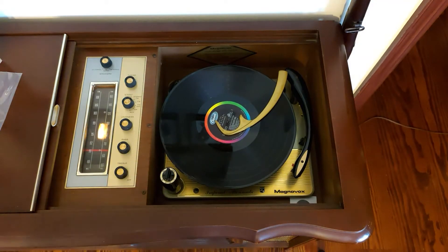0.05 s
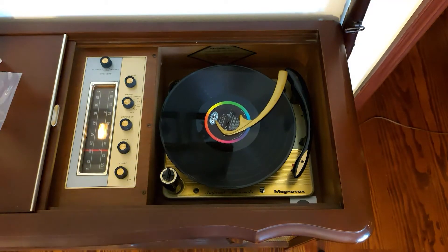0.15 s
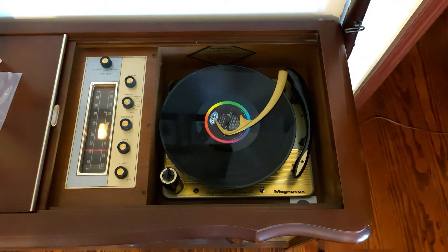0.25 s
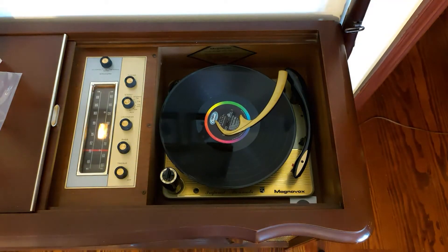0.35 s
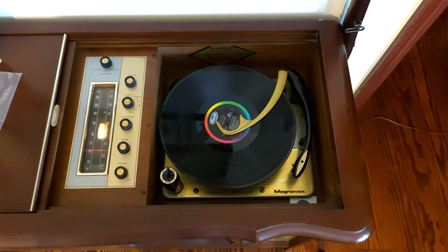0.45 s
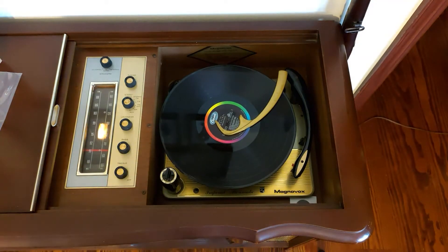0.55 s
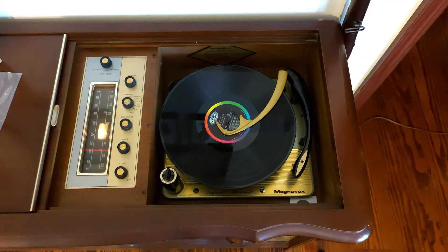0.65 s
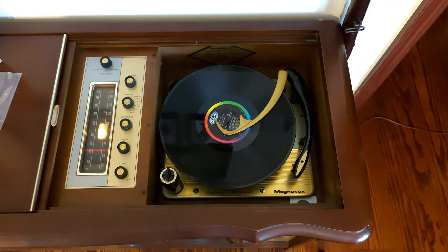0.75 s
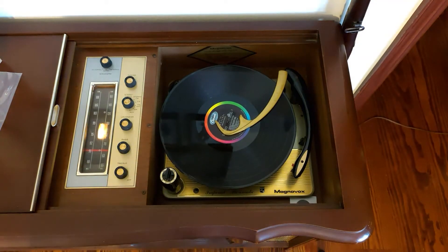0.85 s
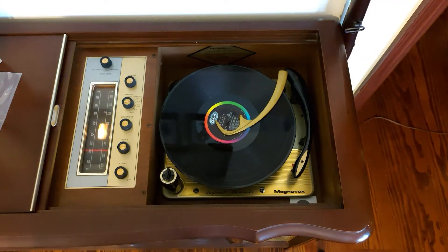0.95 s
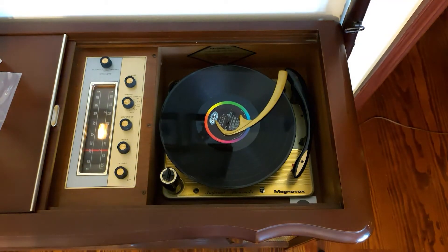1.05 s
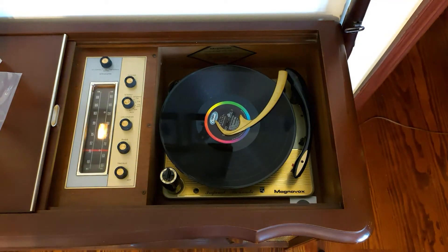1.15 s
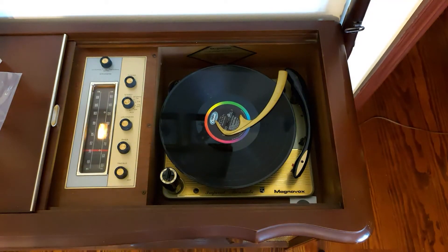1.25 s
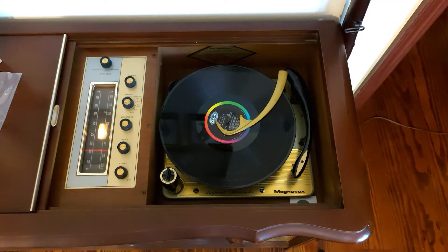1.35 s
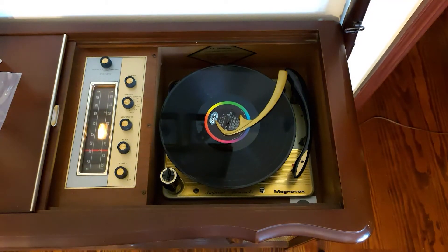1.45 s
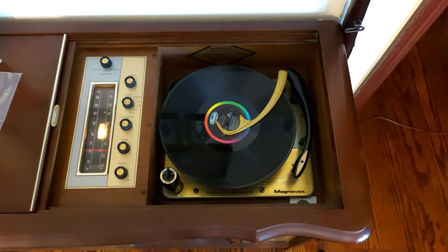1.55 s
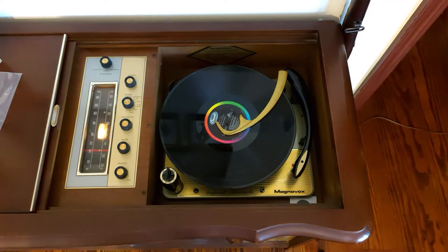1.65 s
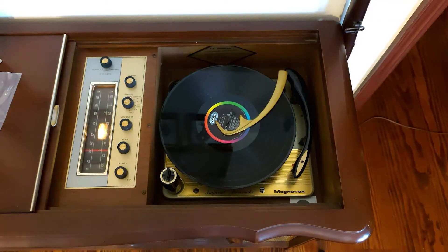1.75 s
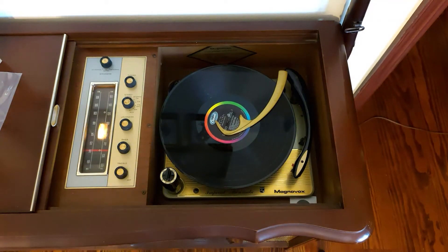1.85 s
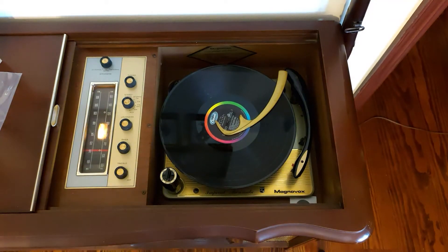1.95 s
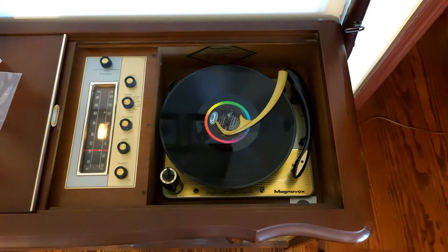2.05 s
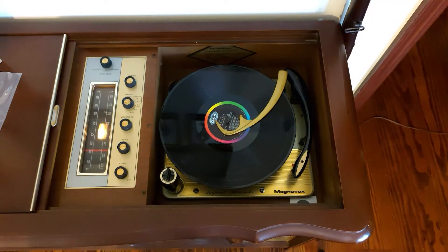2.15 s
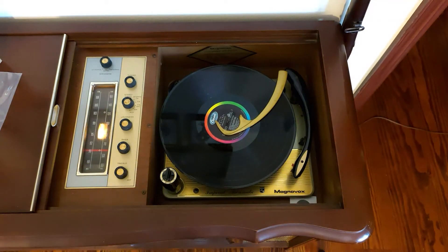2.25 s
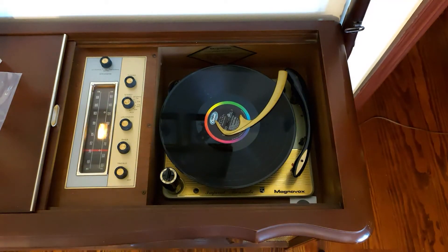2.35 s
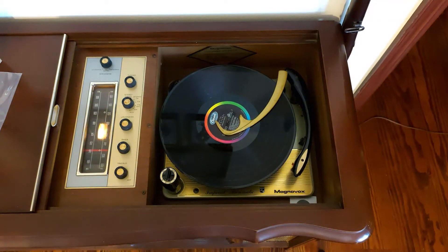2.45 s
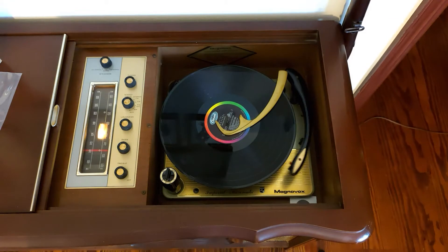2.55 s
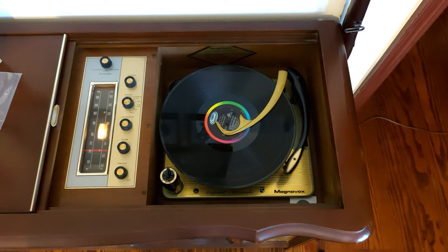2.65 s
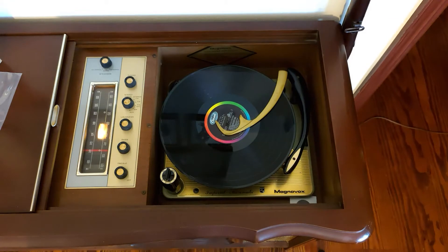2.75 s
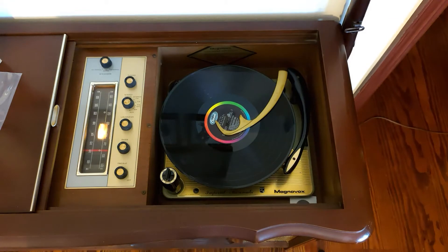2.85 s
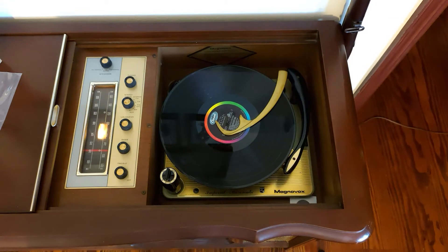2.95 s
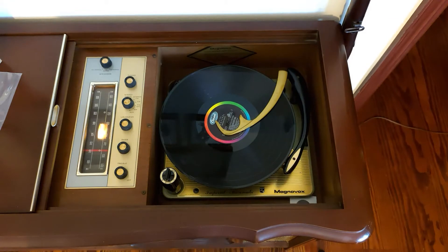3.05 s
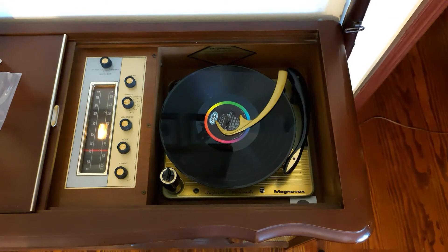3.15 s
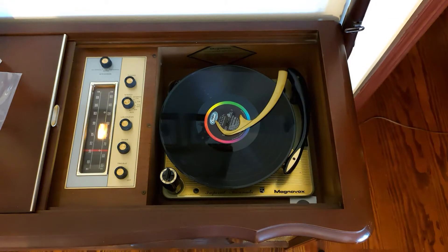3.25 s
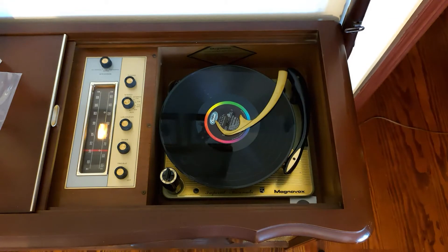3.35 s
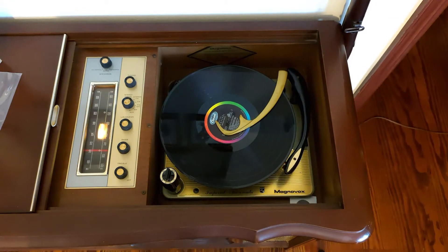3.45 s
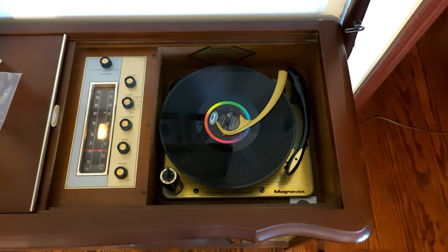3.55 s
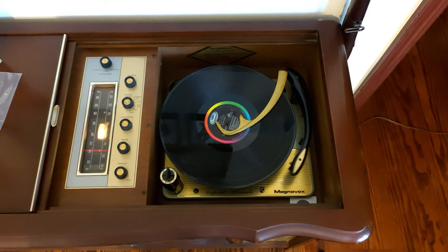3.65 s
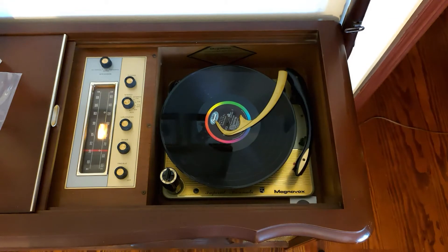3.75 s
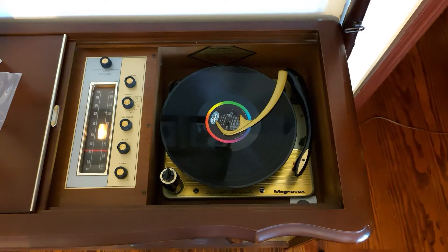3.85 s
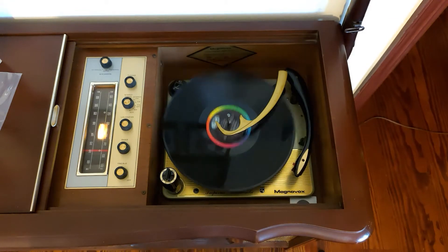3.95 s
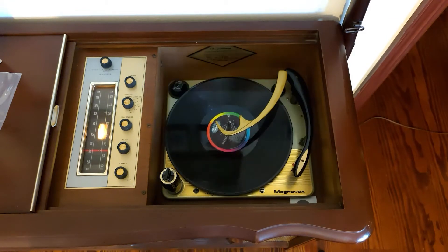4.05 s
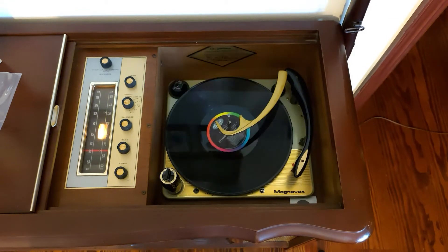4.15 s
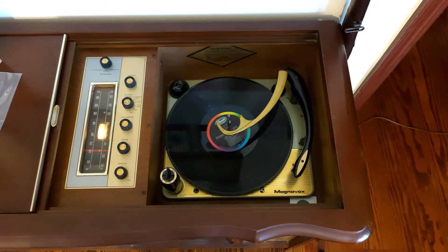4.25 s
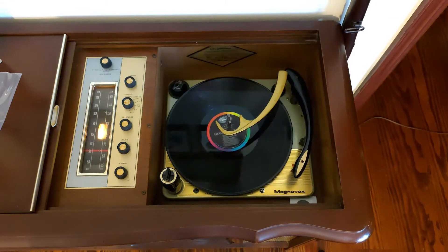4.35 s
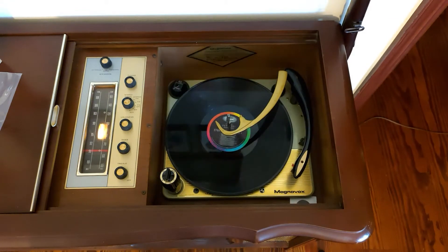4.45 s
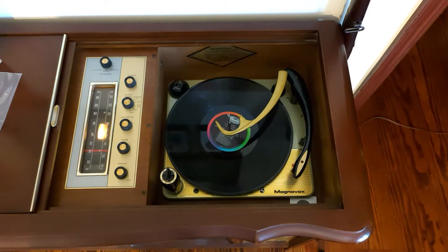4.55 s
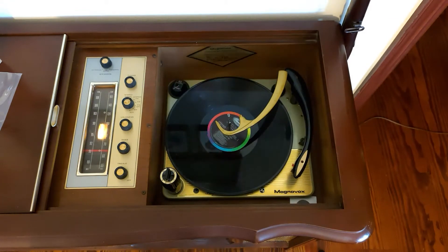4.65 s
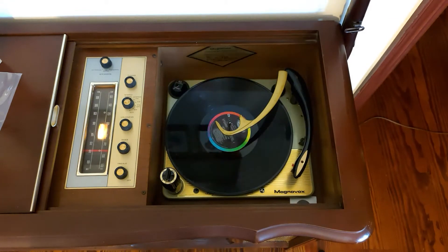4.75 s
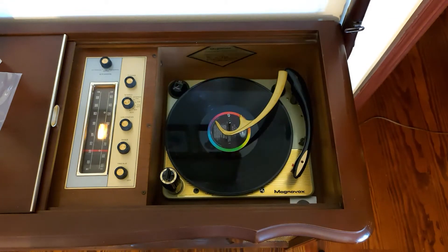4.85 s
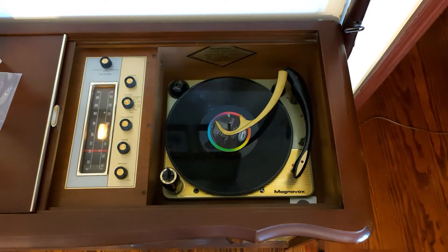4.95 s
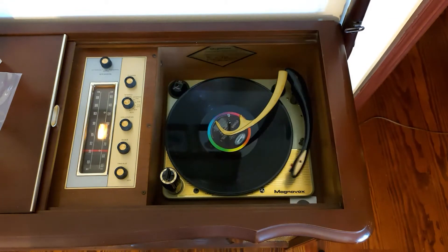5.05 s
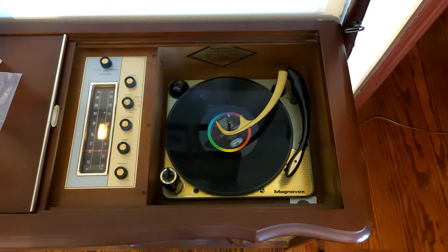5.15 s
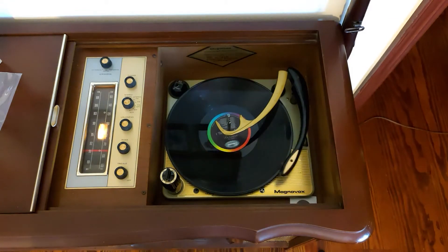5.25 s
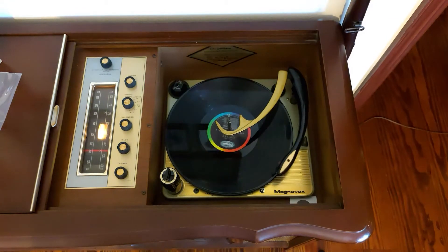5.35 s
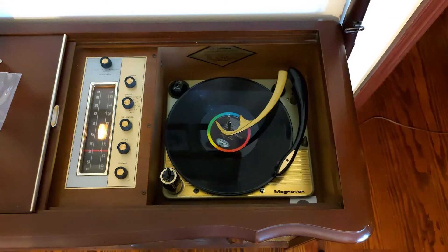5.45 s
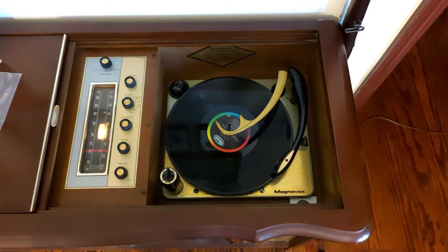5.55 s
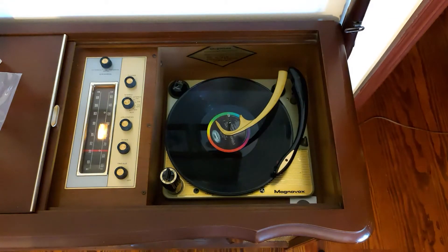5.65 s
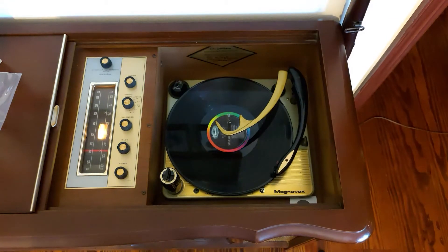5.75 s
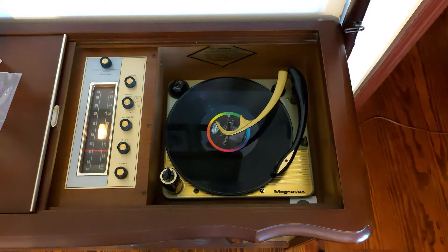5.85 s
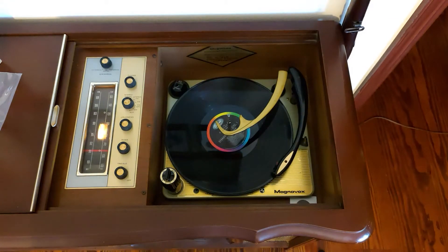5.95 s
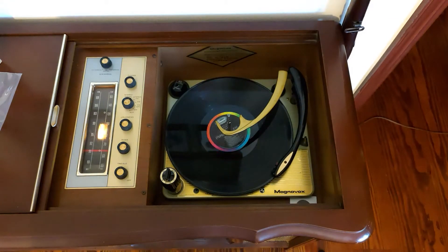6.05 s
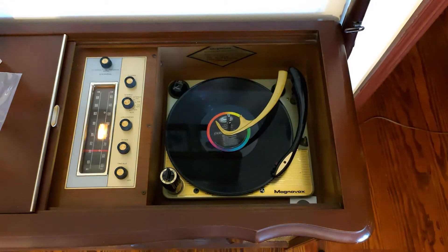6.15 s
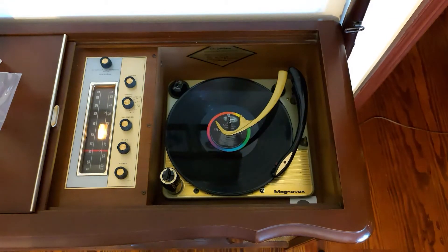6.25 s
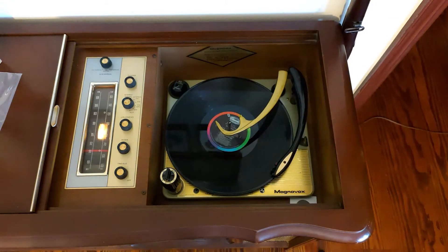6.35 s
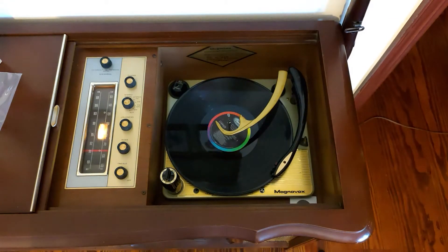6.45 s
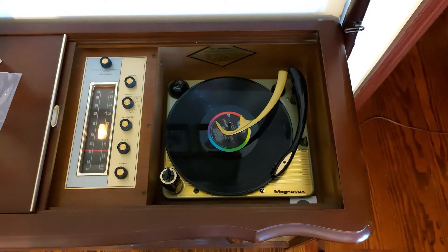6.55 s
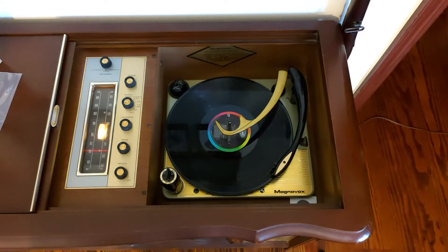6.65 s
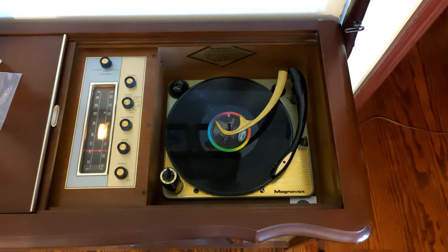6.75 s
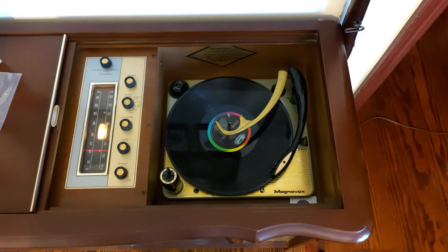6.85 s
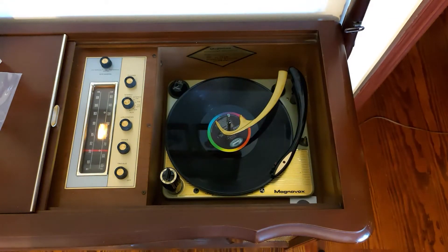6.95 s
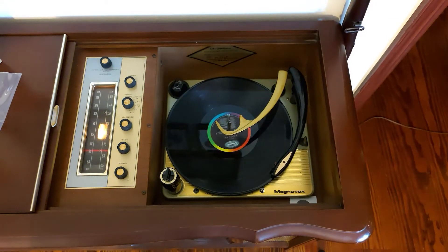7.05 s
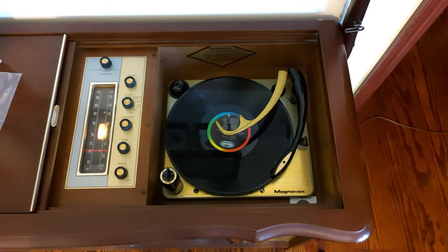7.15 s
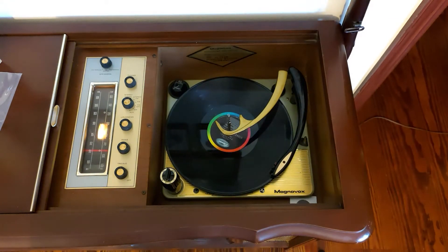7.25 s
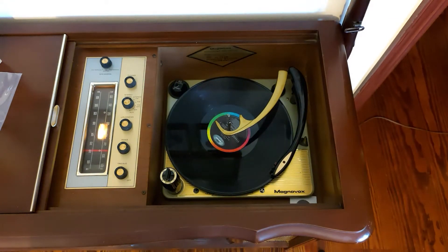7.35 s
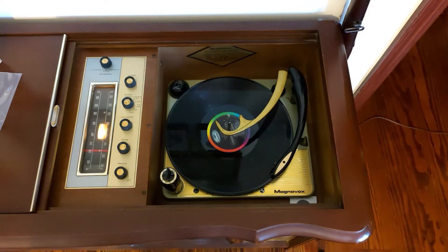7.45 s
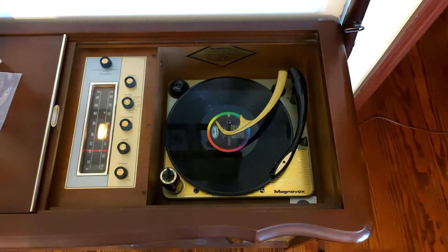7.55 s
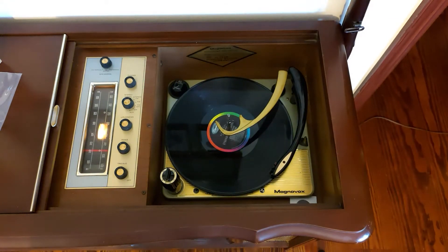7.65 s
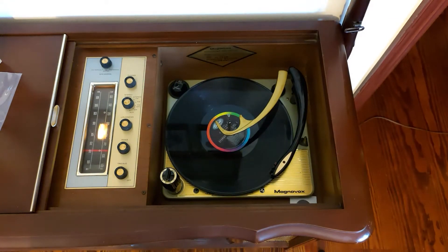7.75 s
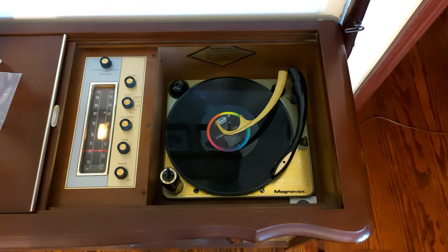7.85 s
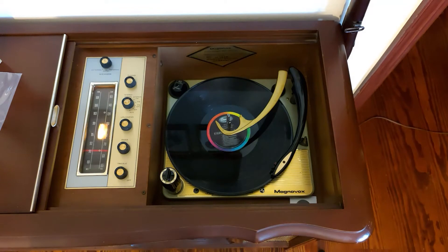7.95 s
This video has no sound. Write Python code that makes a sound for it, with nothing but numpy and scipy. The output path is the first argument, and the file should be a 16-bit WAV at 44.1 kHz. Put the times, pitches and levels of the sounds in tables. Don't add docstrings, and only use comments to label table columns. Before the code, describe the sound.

In a small quiet room, a faint motor hum comes first, with one small knock. Levers tap and clunk and a cam rubs in short catches. A very loud steel latch crack rings briefly, then more clunks, a heavy soft double thump as the disc drops, sharp clicks, and the needle landing with bassy speaker rumble. Close microphone, slight room echo.

```python
import sys
import numpy as np
from scipy import signal
from scipy.fft import rfft, irfft
from scipy.io import wavfile
from scipy.ndimage import uniform_filter1d

SR = 44100
rng = np.random.default_rng(int(sys.argv[2]) if len(sys.argv) > 2 else 0)


def inscribe(sig):
    pcm = np.round(np.clip(np.atleast_2d(sig).T, -1, 1) * 32767)
    wavfile.write(sys.argv[1], SR, pcm.astype(np.int16))


def boost_factor(decibels):
    exponent = np.asarray(decibels, float) / 20
    return 10 ** exponent


N = 352359
BLOW_T = np.arange(int(0.6 * SR)) / SR

# [f/Hz, level/dB per Hz]
AIR = [(20, -23), (53, -13), (85, -17.5), (115, -2), (150, -8.5), (250, 0), (330, -9), (480, -7),
       (700, -11), (1750, -16.5), (5000, -23.5), (9000, -28.5), (15300, -21.5), (16500, -34.5)]
AIR_DB = -68
# [f/Hz, level/dB]
HUM_LINES = [(118.4, -81), (177.6, -82), (242.2, -87.5), (479.1, -89)]
# [f/Hz, level/dB]
MOTOR_LINES = [(59.2, -83.5), (177.6, -74.5), (301.5, -81)]
# [t/s, level/dB]
MOTOR_LOAD = [
    (0, -67),
    (2.6, -3),
    (2.9, -6.5),
    (4.6, 0.5),
    (6, -0.5),
    (8, 0.5),
]
# [f/Hz, t60/s, echo level/dB]
ROOM = [(59.65, .45, -6), (301, 0.42, -5), (1498, 0.36, -3.5), (5000, 0.455, -8), (13960, 0.21, -3.5)]
ROOM_RISE_S = 0.0015

# [f/Hz, width/Hz, level/dB]
PIVOT = [(1300, 200, -12), (2008, 240, -3), (2630, 265, 4), (3030, 500, -4)]
# [t/s, level/dB]
SWINGS = [
    (6.59, -59.5),
    (6.664, -74),
    (6.928, -71),
]
SWING_RISE_S, SWING_FADE_DB_S = 0.026, 94

# [f/Hz, width/Hz, level/dB]
DECK = [(260, 150, -1.5), (637, 63, -0.5), (1124, 47, -1.5), (1650, 53, -7), (2700, 530, -11),
        (4370, 1500, -14.5)]
# [t/s, level/dB]
CATCHES = [
    (2.775, -51.5),
    (2.945, -67),
    (3.001, -63.5),
    (3.419, -78),
    (5.14, -66),
    (5.182, -55),
    (5.22, -60),
    (5.324, -55),
]
CATCH_RISE_S, CATCH_FADE_DB_S = 0.01, 255
TOOTH_FIRST_S, TOOTH_GAP_S, TOOTH_DB, TOOTH_GROWS_DB = 3.125, 0.0672, -65, 1.6

# [f/Hz, level/dB, t60/s]
CABINET = [(92, -6.5, 0.097), (167, -2.5, 0.41), (276, -20, 1)]
# [t/s, level/dB, plate note f/Hz, contact/ms]
TAPS = [(2.252, -51, 1040, 12), (2.366, -51.5, 650, 18), (2.769, -30.5, 515, 12), (3.737, -52, 480.8, 5.5),
        (3.759, -48.5, 500, 13), (3.898, -50.5, 624, 4.2), (3.938, -55, 689.5, 6), (4.543, -49, 590, 9.2),
        (5.092, -54.5, 940, 6), (5.589, -51.5, 523, 9.5), (6.56, -41.5, 1300, 8.6), (7.231, -45, 777, 5),
        (2.779, -40, 1080, 6.9)]
# [t/s, level/dB, plate note f/Hz, contact/ms]
TWANGS = [
    (0.288, -55.5, 540, 14),
    (3.574, -56, 810, 26),
    (3.977, -35, 767, 31),
    (4.011, -39, 786, 16),
    (7.772, -46.5, 480, 12),
]
# [t/s, level/dB, plate note f/Hz, contact/ms]
THUMPS = [(2.775, -37.5, 474, 4.9), (3.819, -53.5, 474, 12), (3.971, -50.5, 829, 5.7),
          (5.134, -54, 600, 6.6), (5.173, -44, 1080, 4.7), (5.204, -44.5, 1170, 3.6), (5.211, -35, 179, 6),
          (5.313, -46, 1150, 6.9), (5.331, -42, 505, 6.6), (7.329, -36.5, 474, 4.2), (7.548, -48, 505, 9.1)]
# [note share level/dB, cabinet beside plate level/dB]
TAP_MIX = (9.8, -26)
TWANG_MIX = (12, -15)
THUMP_MIX = (0.3, -0.5)

# [t/s, level/dB, ring f/Hz, contact/ms]
KNOB = [
    (2.252, -40, 2750, 8.4),
    (2.2882, -44.5, 1650, 8.2),
]
# [t/s, level/dB, ring f/Hz, contact/ms]
SNAPS = [
    (3.5594, -62.5, 1710, 7.4),
    (4.074, -52.5, 2317, 4),
    (5.3108, -46.5, 2700, 3.4),
    (7.2229, -45.5, 2545, 6.7),
    (7.3679, -40, 1880, 5),
    (7.4364, -43, 3560, 5.7),
]
# [t/s, level/dB, ring f/Hz, contact/ms]
TICKS = [(1.1894, -68, 1810, 4.6), (3.695, -64, 5600, 6), (3.7323, -53, 5730, 12), (4.049, -59, 6470, 5.8),
         (4.341, -57, 7000, 3.6), (5.1027, -52, 2390, 9), (6.5563, -32, 2200, 3.2), (7.231, -33, 2210, 5.2),
         (7.3073, -49, 3670, 9), (7.3267, -37, 2430, 20), (7.3426, -32.5, 2740, 15),
         (7.5554, -59, 1720, 6.5), (7.641, -54.5, 2190, 4.6)]
# [t/s, level/dB, ring f/Hz, contact/ms]
PINGS = [(3.0001, -45.5, 1860, 7.2), (3.4171, -55, 1510, 3.4), (3.7604, -49, 2880, 4.5),
         (5.2024, -61, 2760, 3.9), (5.315, -53, 2750, 9), (5.176, -64, 2700, 5.3), (5.5832, -52.5, 2100, 5),
         (5.5952, -53.5, 2440, 4.5), (7.0225, -58, 2560, 4), (7.0996, -49.5, 2770, 17),
         (7.7692, -53.5, 3380, 18.6), (7.8423, -56.5, 3330, 5)]
# [t/s, level/dB, ring f/Hz, contact/ms]
CLACKS = [(0.287, -52, 2600, 7.7), (2.7704, -61, 2160, 3.3), (2.7787, -47.5, 1580, 4.2),
          (2.9396, -54, 1650, 22), (3.8175, -55.5, 3170, 11), (3.9864, -54.5, 1606, 3.1),
          (5.0905, -51.5, 2520, 8.9), (5.1715, -44.5, 2700, 4.4), (6.544, -44, 2470, 10.2),
          (7.1383, -72, 2810, 6.6), (7.469, -44.5, 1390, 2.6)]
# [ring share level/dB, bright tick beside crack level/dB]
KNOB_MIX = (-1, 4.4)
SNAP_MIX = (-6.5, -4.5)
TICK_MIX = (-5.5, -5.5)
PING_MIX = (19, -17)
CLACK_MIX = (0.5, -19)

# [f/Hz, level/dB per Hz]
SCRAPE = [(700, -6), (1300, -6.5), (2200, -6), (3500, -6), (5500, -26), (10000, -17.5), (16000, -27.5)]
# [t/s, level/dB]
SKIDS = [
    (7.232, -47.5),
    (7.348, -42.5),
    (7.438, -52.5),
]
SKID_RISE_S, SKID_FADE_DB_S = 0.012, 1002.5
# [f/Hz, width/Hz, level/dB]
SPEAKER = [(100.2, 16.6, 1.5), (135.7, 36, 3), (176.6, 39, 2), (252.8, 59, -4.5), (365, 116, -19.5),
           (474, 49, -13.5), (607, 37, -16)]
# [t/s, rumble level/dB]
BUMPS = [
    (7.268, -36),
    (7.305, -39.5),
    (7.345, -30.5),
    (7.368, -31.5),
    (7.44, -36),
    (7.484, -38),
    (7.558, -45),
    (7.666, -40.5),
    (7.846, -52),
    (7.972, -56),
]
BUMP_RISE_S, BUMP_FADE_DB_S = 0.026, 236
LANDS_S, GROOVE_DB, DUST_DB, SETTLES_DB_S, DUST_CLEARS_DB_S = 7.268, -49, -61, 7.5, 13

# [t/s, level/dB, push/ms, shudder below it level/dB, chatter level/dB]
DROPS = [
    (6.154, -7, 2.27, -5.5, -27.5),
    (6.1585, -11.5, 5.7, -17, -35.5),
    (6.237, -11, 1.17, -4.5, -28),
    (6.244, -11, 6.3, -7, -29.5),
]
# [f/Hz, level/dB, t60/s]
PLATTER = [(479, 4, 0.2), (624, 2.5, 0.12), (670, -7, 0.353), (829, -22, 0.3), (950, -16, 0.18),
           (1046, -16, 0.245)]
# [f/Hz, level/dB per Hz]
DISC_TONE = [(40, -39), (95, 2.5), (165, -3), (220, -11.5), (280, -9), (360, -20.5), (480, -14),
             (1300, -26), (3500, -32), (6500, -54), (10000, -54.5), (16000, -77)]

# [t/s, level/dB, brightness/dB an octave, pin level/dB, contact/ms]
LATCH_BLOWS = [
    (4.086, -3.5, 1.8, -47.5, 3.5),
    (4.0988, -4.5, -0.6, -42.5, 4.6),
    (4.113, -17.5, 0.2, -32, 2.9),
    (4.121, -16.5, -3, -42.5, 2.3),
]
# [f/Hz, level/dB, t60/s]
LATCH_DECK = [(265, 0, 0.38), (554.5, -2.5, 0.19), (810, -6.5, 0.09), (824, -3, 0.23), (1031, 1, 0.17),
              (1077, -4, 0.22), (1300, 7.5, 0.15), (1420, -10, 0.05), (1691, -18, 1.0), (1810, -19, 0.15),
              (2070, -12.5, 0.32), (2120, -13, 0.28), (2390, -15, 0.22), (3000, -18.5, 0.72)]
# [f/Hz, level/dB, t60/s]
LATCH_PIN = [(10060, -4, .24), (10170, 0, .3), (10300, -5, .2)]
# [f/Hz, level/dB per Hz]
LATCH_TONE = [(60, -39), (120, -16.5), (200, -19), (270, -8.5), (560, -7.5), (1000, 2), (1500, -5.5),
              (2300, -7.5), (4000, -21), (6500, -31), (10000, -27.5), (15300, -43), (16400, -52)]


def level(x, db):
    return x * boost_factor(db) / np.sqrt(np.mean(x ** 2))


def band(x, lo_hz, hi_hz, order=2):
    edges = [lo_hz, min(hi_hz, .45 * SR)]
    return signal.sosfilt(signal.butter(order, edges, "band", fs=SR, output="sos"), x)


def ring(x, hz, t60):
    decay = np.log(1000) / (max(t60, .003) * SR)
    pole = np.exp(2j * np.pi * hz / SR - decay)
    return signal.lfilter([1], [1, -pole], x).imag


def body(x, modes, damp, scatter_db):
    total = 0
    for hz, db, t60 in modes:
        strength, sign = rng.standard_normal(2)
        total = total + boost_factor(db + scatter_db * strength) * np.sign(sign) * ring(x, hz, damp * t60)
    return total


def contact(ms, rough=0.46):
    force = rough * rng.standard_normal(len(BLOW_T)) * np.exp(-BLOW_T * 1000 / max(ms, .2))
    force[0] += 1.2
    return force


def add(out, s, x, db):
    i = int(s * SR)
    out[i:i + len(x)] += (x * boost_factor(db) / np.abs(x).max())[:N - i]


def curve(rows, column):
    rows = np.array(rows)
    return boost_factor(np.interp(np.arange(N) / SR, rows[:, 0], rows[:, column], left=-150, right=-150))


def jolts(rows, rise_s, fade_db_s):
    t = np.arange(N) / SR
    gain = 0
    for s, db in rows:
        swell = np.sin(np.pi / 2 * np.clip((t - s) / max(rise_s, .001) + 1, 0, 1)) ** 2
        gain = gain + swell * boost_factor(db - fade_db_s * np.maximum(t - s, 0))
    return gain


def colour(x, points):
    hz, db = np.transpose(points)
    log_f = np.log(np.arange(N // 2 + 1) * SR / N + 1e-3)
    return irfft(rfft(x) * boost_factor(np.interp(log_f, np.log(hz), db, right=-90)), N)


def tone(x, points, tilt_db):
    size = 2 ** 15
    hz, db = np.transpose(points)
    log_f = np.log(np.arange(size // 2 + 1) * SR / size + 10)
    octaves = (log_f - np.log(1000)) / np.log(2)
    gain = boost_factor(np.interp(log_f, np.log(hz), db) + tilt_db * octaves)
    cepstrum = irfft(np.log(gain), size)
    cepstrum[1:size // 2] *= 2
    cepstrum[size // 2 + 1:] = 0
    return irfft(rfft(x, size) * np.exp(rfft(cepstrum)), size)[:len(x)]


def walk(rate):
    k = int(SR / rate)
    steps = np.repeat(rng.standard_normal(N // k + 1), k)
    return level(uniform_filter1d(uniform_filter1d(steps, k), k)[:N], 0)


def humps(peaks, grain_db, rate, order=1):
    total = 0
    for hz, width, db in peaks:
        shake = rng.standard_normal(N) * boost_factor(grain_db * walk(rate))
        total = total + level(band(shake, hz - width / 2, hz + width / 2, order=order), db)
    return level(total, 0)


def still_air():
    return level(colour(rng.standard_normal(N), AIR), AIR_DB) * boost_factor(.4 * walk(12.0))


def hum_line(hz, db):
    t = np.arange(N) / SR
    return level(np.sin(2 * np.pi * hz * t + .5 * walk(9)), db) * boost_factor(2.5 * walk(11))


def hum():
    mains = sum(hum_line(*row) for row in HUM_LINES)
    motor = sum(hum_line(*row) for row in MOTOR_LINES)
    return mains + curve(MOTOR_LOAD, 1) * motor


def room(x):
    hz, t60, db = np.transpose(ROOM)
    tail = 0
    for lo in 40 * 2 ** np.arange(0, 8.1):
        centre = np.log(np.sqrt(2) * lo)
        decay = boost_factor(-60 * BLOW_T / np.interp(centre, np.log(hz), t60))
        rise = 1 - np.exp(-BLOW_T / ROOM_RISE_S)
        echoes = band(rng.standard_normal(len(BLOW_T)), lo, 2 * lo) * decay * rise
        echo_gain = boost_factor(np.interp(centre, np.log(hz), db))
        tail = tail + echo_gain * echoes * np.sqrt(2 * lo / SR / np.sum(echoes ** 2))
    x = signal.sosfilt(signal.butter(4, 78, "high", fs=SR, output="sos"), x)
    return x + signal.fftconvolve(x, tail)[:N]


def arm():
    whisper = humps(PIVOT, grain_db=1.5, rate=8)
    return boost_factor(-4) * whisper * jolts(SWINGS, SWING_RISE_S, SWING_FADE_DB_S)


def cam():
    teeth = [(TOOTH_FIRST_S + k * TOOTH_GAP_S, TOOTH_DB + k * TOOTH_GROWS_DB) for k in range(4)]
    rub = humps(DECK, grain_db=1.5, rate=16)
    return boost_factor(4.0) * rub * jolts(CATCHES + teeth, CATCH_RISE_S, CATCH_FADE_DB_S)


def levers():
    out = np.zeros(N)
    for rows, (note_db, cabinet_db) in ((TAPS, TAP_MIX), (TWANGS, TWANG_MIX), (THUMPS, THUMP_MIX)):
        for s, db, hz, ms in rows:
            force = contact(ms)
            plate = [(hz, 0, .03), (1.25 * hz, -5, .025), (.7 * hz, -6, .025)]
            note = band(body(force, plate, 0.99, 0.57), 150, 3000)
            knock = band(force, 280, 1500)
            add(out, s, level(note, note_db) + level(knock, 0), db)
            boom = body(force, CABINET, .3, 2.34)
            thump = band(force, 87, 230)
            add(out, s, level(boom, -3) + level(thump, 0), db + cabinet_db)
    return out


def clicks():
    out = np.zeros(N)
    kinds = ((KNOB, KNOB_MIX), (SNAPS, SNAP_MIX), (TICKS, TICK_MIX), (PINGS, PING_MIX), (CLACKS, CLACK_MIX))
    for rows, (ring_db, tick_db) in kinds:
        for s, db, hz, ms in rows:
            force = contact(ms, rough=0.71)
            crack = band(force, 1300, 6000)
            add(out, s, level(ring(force, hz, .010), ring_db) + level(crack, 0), db)
            tick = band(contact(0.64 * ms, rough=1.9), 8500, 13000)
            add(out, s, tick, db + tick_db)
    return out


def dust():
    grit = rng.standard_normal(N) * boost_factor(1.9 * walk(60))
    riding = jolts([(LANDS_S, DUST_DB)], SKID_RISE_S, DUST_CLEARS_DB_S)
    skidding = jolts(SKIDS, SKID_RISE_S, SKID_FADE_DB_S)
    return level(colour(grit, SCRAPE), 0.39) * (skidding + riding)


def rumble():
    boom = band(humps(SPEAKER, grain_db=0.5, rate=13, order=2), 88, 777)
    even = boom / np.sqrt(uniform_filter1d(boom ** 2, int(0.0337 * SR)))
    riding = jolts([(LANDS_S, GROOVE_DB)], BUMP_RISE_S, SETTLES_DB_S)
    return boost_factor(-3.0) * even * (jolts(BUMPS, BUMP_RISE_S, BUMP_FADE_DB_S) + riding)


def disc():
    out = np.zeros(N)
    swell = 1 - np.exp(-BLOW_T / 0.00072)
    for s, db, push_ms, shudder_db, chatter_db in DROPS:
        push = np.sin(np.pi * np.clip(BLOW_T * 1000 / max(push_ms, .5), 0, 1)) ** 2
        add(out, s, band(push, 81, 1400, order=1), db)
        cabinet = level(body(push, CABINET, 0.76, 1.6), -10.0)
        platter = level(body(push, PLATTER, 0.33, 3.7), -4.5)
        shudder = level(tone(swell * contact(27.16), DISC_TONE, 0), 0)
        add(out, s, cabinet + platter + shudder, db + shudder_db)
        chatter = band(swell * contact(7.7, rough=3.13), 1600, 3770)
        add(out, s, chatter, chatter_db - 1)
    return out


def latch():
    out = np.zeros(N)
    modes = [(hz, db, min(t60, .33)) for hz, db, t60 in LATCH_DECK]
    for s, db, tilt_db, pin_db, ms in LATCH_BLOWS:
        force = contact(ms)
        deck = band(body(force, modes, 0.43, 1.0), 250, 3500)
        buzz = level(force, 0) + level(contact(25), -6)
        add(out, s, level(deck, -8.5) + level(tone(buzz, LATCH_TONE, tilt_db), 0), db)
        pin = band(body(contact(11), LATCH_PIN, 0.37, 0.98), 7000, 11500)
        add(out, s, pin, pin_db)
    return out


def scene():
    mechanism = arm() + cam() + levers() + clicks() + dust() + disc() + latch()
    return (still_air() + hum() + room(mechanism) + rumble())[None]


def top_cut(x):
    return signal.sosfilt(signal.butter(12, 16820, fs=SR, output="sos"), x)


def record(dry):
    dip_hz, dip_width_hz, depth = 8400, 2500, .75
    notched = signal.lfilter(*signal.iirnotch(dip_hz, dip_hz / dip_width_hz, SR), dry)
    return top_cut(dry + depth * (notched - dry))


dry = scene()
out = record(dry)
inscribe(out)
```